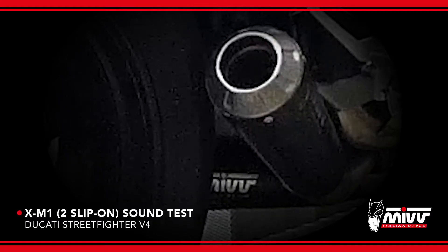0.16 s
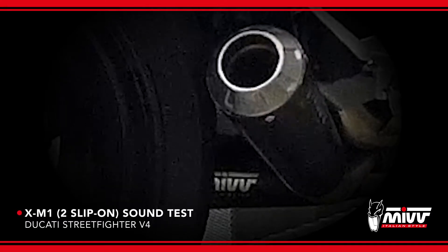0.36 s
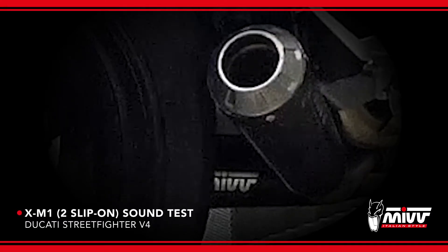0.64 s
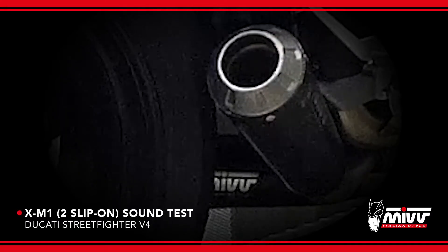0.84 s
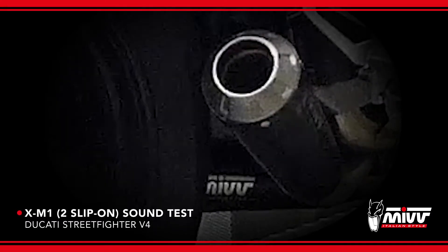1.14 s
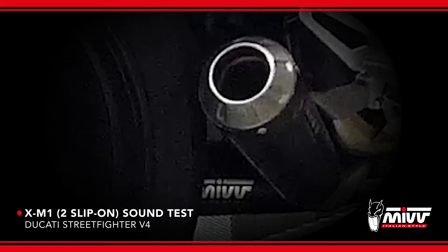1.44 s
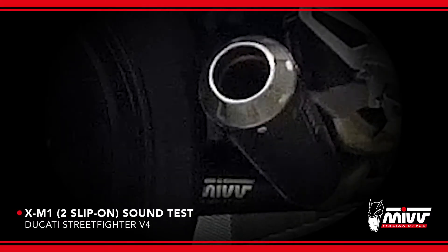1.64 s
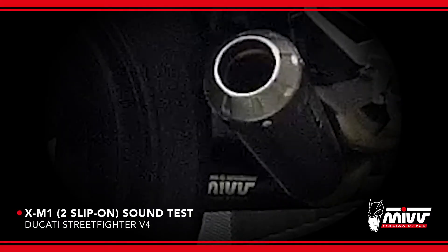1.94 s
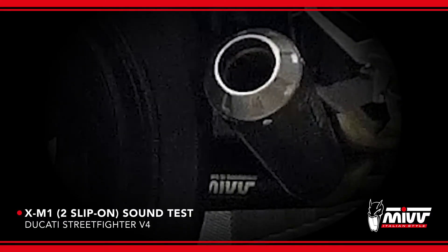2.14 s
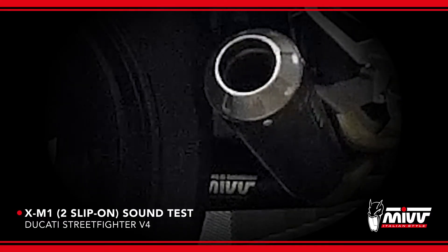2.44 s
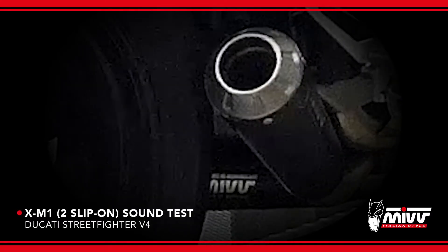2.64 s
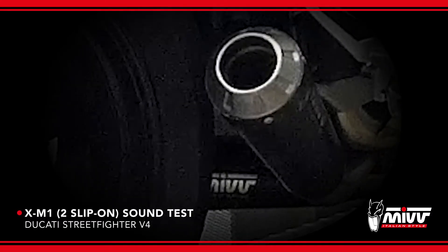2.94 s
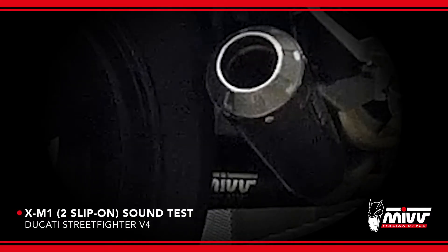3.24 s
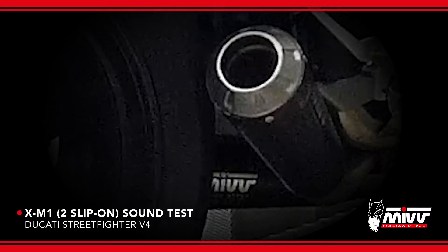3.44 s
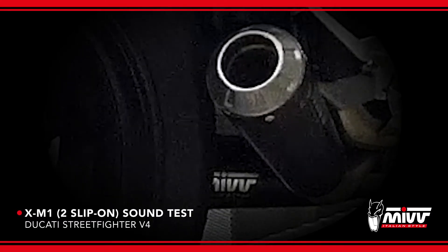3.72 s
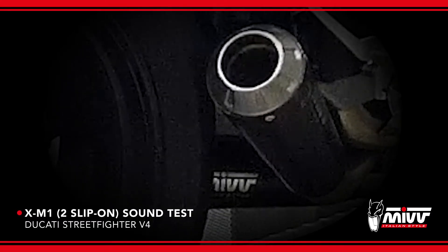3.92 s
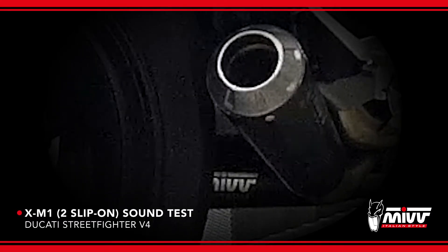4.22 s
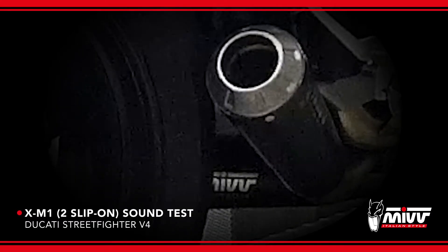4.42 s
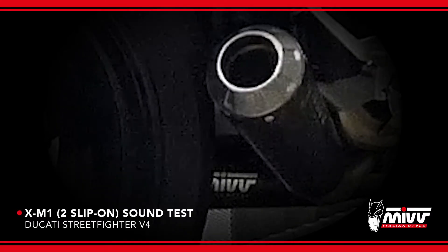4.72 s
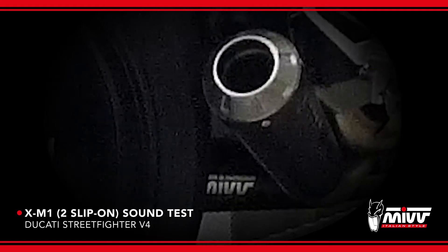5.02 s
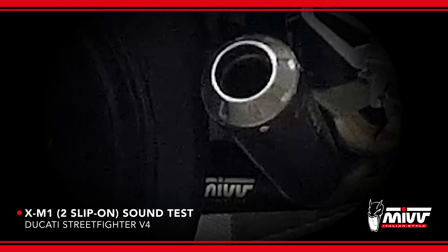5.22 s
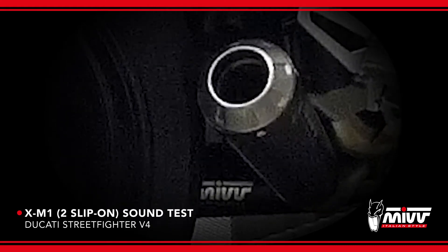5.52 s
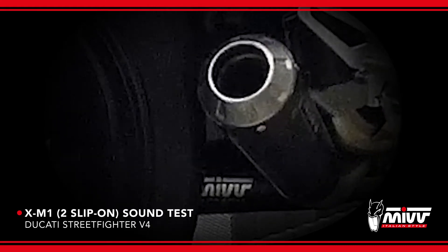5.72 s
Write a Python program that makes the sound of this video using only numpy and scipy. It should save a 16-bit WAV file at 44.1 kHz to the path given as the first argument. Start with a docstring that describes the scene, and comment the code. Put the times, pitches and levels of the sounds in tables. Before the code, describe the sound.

A four-cylinder motorcycle engine runs under load on a roller stand, heard close to the silencer, with a deep, booming, raspy exhaust note. Its pitch rises from the start until 1 second, then falls quickly as the throttle shuts. From about 1.2 to 1.7 seconds it burbles low and ragged, and the slack drive gives bright metallic cracks, the clearest at 1.3 and 1.7 seconds. From about 1.8 seconds the revs climb steadily, growing harder and raspier, to their highest point just before 5 seconds. The pitch then plunges with a ragged throb and sharp cracks near 5.05 and 5.3 seconds. Around 5.4 seconds the engine picks up again and holds middling revs, slightly uneven, until nearly 6 seconds. Gas hiss and fine valve rattle continue above the exhaust, a thin gear whine swells and fades during the pulls, and a faint tyre rumble lies underneath.

```python
"""A V4 motorcycle exhaust, heard at the silencer as the engine pulls under load on a roller stand:
the revs climb, drop, climb long and drop again. Four unevenly spaced firings per cycle ring the pipe
and rasp at the outlet; off the throttle they turn weak and ragged. Each engine layer swells at the revs
that meet its resonances. Gas hiss and valve rattle lie above, a gear whine sweeps through casing
resonances, the drive snaps as it goes slack, and the tyre rumbles underneath."""
import sys
import numpy as np
from scipy import signal
from scipy.fft import rfft, irfft, next_fast_len
from scipy.io import wavfile
from scipy.ndimage import uniform_filter1d, map_coordinates

SR = 44100
rng = np.random.default_rng(int(sys.argv[2]) if len(sys.argv) > 2 else 0)


def put_to_file(sound):
    """Save the sound as 16-bit audio at rate SR, in the file named by the first command-line argument."""
    columns = np.atleast_2d(sound).T  # one column per channel
    safe = np.clip(columns, -1, 1)
    whole_steps = np.round(safe * 32767)
    wavfile.write(sys.argv[1], SR, whole_steps.astype(np.int16))


N = 258426

# Engine speed, one cycle being two turns of the crank: (time [s], cycle rate [Hz])
CYCLE_RATE = [(0.0, 32.4), (0.15, 34.1), (0.31, 37.12), (0.88, 45.53), (0.99, 46.94), (1.08, 44.26),
              (1.17, 39.5), (1.27, 33.07), (1.32, 33.5), (1.4, 36.02), (1.55, 35.04), (1.65, 35.3),
              (1.76, 39.27), (1.78, 39.65), (1.84, 35.7), (2.04, 37.76), (2.28, 38.52), (3.02, 45.26),
              (3.82, 54.18), (4.32, 59.53), (4.8, 64.16), (4.96, 64.76), (5.03, 62.37), (5.12, 55.34),
              (5.24, 45.24), (5.26, 44.27), (5.32, 42.4), (5.34, 41.84), (5.45, 50.34), (5.47, 50.5),
              (5.75, 52.54), (5.86, 49.75)]
# Two pulls, each ended by a snap shut, then a part-open cruise: (time [s], opening [0-1])
THROTTLE = [(0, 0.96), (.3, 0.99), (1.02, 0.99), (1.08, 0.13), (1.15, 0.15), (1.25, 0), (1.58, 0.42),
            (1.77, 0.85), (1.9, 0.78), (2.4, 1), (4.96, 0.96), (4.99, 0.43), (5.18, 0.18), (5.34, 0),
            (5.47, 0.42), (5.76, 0.33), (5.86, 0.65)]
# Firing of the four cylinders: (crank angle [degrees])
FIRING_ANGLES = [0, 90, 290, 380]
# Each cylinder's header pipe: (delay [ms], strength [dB], change at full starvation [dB])
HEADERS = [(0.24, 4.6, 3), (1.61, 3.2, 4), (0.081, 3.65, 3), (1.965, 2.9, 8)]
# Spells of ragged burning:
# (start [s], end [s], strength scatter [share of mean], starvation [0-1], throb [dB], thump [dB])
RAGGED_SPELLS = [(1.147, 1.746, 0.44, 0.1, -36, -28.5), (4.976, 5.2, 0.22, .15, -34, -23),
                 (5.44, 5.9, 0.13, 0.08, -59, -26)]

# Spectral envelopes: (frequency [Hz], gain [dB])
PIPE_SPECTRUM = [(25, -30.5), (80, -36.5), (135, -28), (178, -15.5), (203, -3), (230, 2), (300, -1),
                 (350, -5.5), (450, -10), (600, -16), (1000, -32), (1300, -41), (1800, -47), (2400, -32),
                 (4000, -62)]
JET_SPECTRUM = [(200, -49), (600, -18), (1000, 4), (1300, 7), (1600, -7), (1900, -11), (3000, 2),
                (6000, -46)]
RUSH_SPECTRUM = [(1060, -59), (1800, -18), (1970, -18.5), (2160, -13), (2500, -11.5), (2780, -3),
                 (3340, -0.5), (3660, -0.5), (4470, -5.5), (5870, -5), (6910, -8), (11600, -7.5),
                 (12900, -8.5), (14200, -8), (15800, -15.5)]
TYRE_SPECTRUM = [(20, -21), (40, -3.5), (65, -1), (90, -12), (160, -5), (250, -0.5), (520, -3), (750, -13),
                 (1200, -29.5), (1900, -26), (3000, -64)]
# Resonances and, where negative, notches: (frequency [Hz], width [Hz], gain [dB])
PIPE_MODES = [(59.5, 13, 26), (107.9, 34.5, 23.5), (148.6, 6.4, 10), (374.4, 7.5, -17), (410.4, 22.3, 11),
              (421.5, 19.3, -13.5), (478, 7.2, -14), (533.7, 86, 6.5), (586.5, 39, -13), (606, 34, 7),
              (676, 19, -20), (734, 13.6, -45), (751, 54, 7.5), (838, 29, 5.5), (913, 14.4, -17),
              (964.5, 53, 11), (1134, 41, -4), (1226, 48, 8.5), (2174, 89, 9)]
JET_MODES = [(1102, 73, -13), (1200, 40, 10.5), (1437, 39, 10.5), (1534.4, 39, 13), (1610, 58, 15.5)]
CASING_MODES = [(2844, 20, 1), (3303, 41, 7.5), (3570, 240, 2.5), (4294, 69, 9.5), (4390, 370, -6.5),
                (5730, 28, 7.5), (5824, 56, 7.5), (6000, 28, 7.5), (6660, 46, -2), (9100, 200, 3),
                (11470, 1100, 3.5)]
WHINE_MODES = [(4680, 250, 6), (5770, 250, 18), (6170, 200, 11), (7550, 900, 2), (9150, 330, 14)]  # casing resonances that the gear tone sweeps through
# Speeds at which an engine order meets a layer's resonance: (cycle rate [Hz], width [Hz], gain [dB])
THROB_SWELLS = [(31.9, 4, 11), (57.7, 5.06, 15.5), (62.36, 5.8, 17.5)]
THUMP_SWELLS = [(34, 3.7, 7.2), (54.32, 7.4, 17), (60.5, 8.04, 12)]
BOOM_SWELLS = [(36.7, 2, -1.2), (45.97, 17.5, 10), (58.9, 9.1, 3.5)]
BARK_SWELLS = [(33.9, 3.6, 5.6), (40.5, 2.5, 7.5), (45.34, 2.2, 5.9), (50.9, 4.8, 5.8), (57, 6.2, 4.6),
               (64.5, 3.7, 6.2)]
RASP_SWELLS = [(36.5, 1.4, 6.8), (41.2, 2, 9.15), (45.15, 1.2, 10.5), (49.3, 2.6, 6.3), (62.4, 14.4, 9.3)]
TREBLE_SWELLS = [(33, 3, -1), (39.06, 7.8, 4), (46.7, 4.5, 1.54), (59.3, 8.5, 3)]
# Impacts in the slack drive: (time [s], relative level [dB])
DRIVE_SNAPS = [(1.1674, -20.5), (1.1942, -27), (1.2512, -31), (1.3013, -9.5), (1.7007, -11), (5.0544, -14),
               (5.2883, -8.5)]

MID_SPEED_HZ, BAND_LIMIT_HZ = 50, 15800
CLEAN_SCATTER, SPELL_FADE_S = .015, 0.077  # strength scatter of clean burning; fade of a ragged spell
TEETH_PER_CYCLE = 121
WHINE_DB, WHINE_OCTAVE_DB = -44, -45  # at full throttle, away from resonances


def exhaust(train, soft_hz):
    """Pipe resonance: pressure pulses excite a deep throb and thump, the silencer's boom and a bark."""
    ragged_throb, ragged_thump = ragged_burning()[2:]
    throb = layer_gain(-46, THROB_SWELLS, shut_db=7, shut_db_per_octave=-4, shut_swell=.3)
    thump = layer_gain(-45, THUMP_SWELLS, shut_db=0, shut_db_per_octave=-8, shut_swell=0.58)
    boom = layer_gain(-16.5, BOOM_SWELLS, shut_db=-4.5, shut_db_per_octave=8)
    bark = layer_gain(-27, BARK_SWELLS, shut_db=-8.5, shut_db_per_octave=-4, shut_swell=.12)
    # a closed throttle rounds the pulses off
    hard = 0.057 + hardness(power=3.8)
    pressure = hard * train + (1 - hard) * lowpass(train, soft_hz, order=2)
    pressure = pressure - lowpass(pressure, edge_hz=18, order=2)
    pipe = resonate(pressure, PIPE_SPECTRUM, PIPE_MODES)
    lowest, deep, body = [lowpass(pipe, edge_hz) for edge_hz in (95.5, 154, 347.4)]
    bass = np.hypot(throb, ragged_throb) * steady(lowest, size=5001)
    bass += np.hypot(thump, ragged_thump) * steady(deep - lowest, size=5001)
    return bass + boom * steady(body - deep) + bark * steady(pipe - body)


def firings(cycles, jitter_s_per_scatter):
    """Propagation delay: each exhaust stroke sends one pulse, which arrives later from a longer header."""
    delay_ms, strength_db, starved_db = np.transpose(HEADERS)
    samples = np.arange(N)
    firing_cycles = np.arange(int(cycles[-1]) + 1)[:, None] + np.array(FIRING_ANGLES) / 720
    arrivals = np.interp(firing_cycles, cycles, samples, right=2 * N) + delay_ms * SR / 1000
    scatter, starvation = [np.interp(arrivals, samples, curve) for curve in ragged_burning()[:2]]
    scatter += CLEAN_SCATTER
    chance = rng.standard_normal((*arrivals.shape, 2))
    sizes = amp(strength_db + starvation * starved_db) * np.abs(1 + scatter * chance[..., 0])
    # a poor burn is also early or late
    arrivals += SR * jitter_s_per_scatter * scatter * chance[..., 1]
    return impulses(arrivals.ravel(), sizes.ravel())


def ragged_burning():
    """Combustion variability: the scatter, starvation, throb gain and thump gain that the spells add."""
    t = np.arange(N) / SR
    total = np.zeros((4, N))
    for start, end, scatter, starved, throb_db, thump_db in RAGGED_SPELLS:
        gate = np.clip(np.minimum(t - start, end - t) / SPELL_FADE_S + .5, 0, 1)
        total += np.outer([scatter, starved, amp(throb_db), amp(thump_db)], gate)
    return total


def hardness(power):
    """Pulse steepness, 0-1: it grows with the throttle and as a power of engine speed."""
    speed = timeline(CYCLE_RATE)
    return timeline(THROTTLE) * (speed / speed.max()) ** power


def layer_gain(base_db, swells, shut_db, shut_db_per_octave, shut_swell=1):
    """Forced resonance: gain swells at set speeds. A shut throttle shifts it and scales the swells."""
    speed, shut = timeline(CYCLE_RATE), 1 - timeline(THROTTLE)
    swell_db = resonance_db(swells, speed) * (1 - shut * (1 - shut_swell))
    shift_db = shut_db + shut_db_per_octave * np.log2(speed / MID_SPEED_HZ)
    return amp(base_db + swell_db + shut * shift_db)


def gas_flow(train, decay_s):
    """Exponential relaxation: the puff of gas that follows each pulse, scaled to mean 1."""
    flow = np.abs(decay(train, decay_s))
    return flow / flow.mean()


def outlet_rasp(train, edge):
    """Jet turbulence: each puff leaves with a steep front, steeper at high revs, and tears into eddies."""
    eddies = unit(gas_flow(train, decay_s=0.0048) * rng.standard_normal(N))
    fronts = edge * hardness(power=4.2) * unit(train)
    jet = resonate(eddies + fronts - lowpass(fronts, edge_hz=1020), JET_SPECTRUM, JET_MODES)
    return layer_gain(-43.5, RASP_SWELLS, shut_db=-6, shut_db_per_octave=5, shut_swell=.3) * steady(jet)


def gas_hiss(train, pulsing, flutter_db):
    """Flow noise: escaping gas hisses, modulated in amplitude by every firing."""
    beat = 1 + pulsing * (gas_flow(train, decay_s=0.00217) - 1)
    noise = casing_noise(beat * amp(flutter_db * wobble(70)), grit_db=1.0)
    gain = layer_gain(-24.5, TREBLE_SWELLS, shut_db=-2.5, shut_db_per_octave=2, shut_swell=0.74)
    return gain * steady(noise - lowpass(noise, edge_hz=7500))


def valve_rattle(cycles, swing_db, chatter_db):
    """Amplitude modulation: valve gear and chain rattle unevenly, harder each cycle and crank turn."""
    swing = np.cos(2 * np.pi * cycles) + np.cos(4 * np.pi * cycles)
    noise = casing_noise(amp(swing_db * swing + chatter_db * wobble(160)), grit_db=0.77)
    gain = layer_gain(-24, TREBLE_SWELLS, shut_db=-2, shut_db_per_octave=2, shut_swell=0.26)
    return gain * steady(lowpass(noise, edge_hz=8100))


def casing_noise(envelope, grit_db):
    """Structural resonance: the metal casings colour a gritty noise that follows the envelope."""
    noise = envelope * amp(grit_db * wobble(900)) * rng.standard_normal(N)
    return resonate(noise, RUSH_SPECTRUM, CASING_MODES)


def gear_whine(cycles, waver_rad, slack_db):
    """Gear meshing: loaded teeth sing at a multiple of engine speed, louder at casing resonances."""
    phase = 2 * np.pi * TEETH_PER_CYCLE * cycles + waver_rad * wobble(150)
    mesh_hz = TEETH_PER_CYCLE * timeline(CYCLE_RATE)
    tone = amp(WHINE_DB + resonance_db(WHINE_MODES, mesh_hz)) * unit(np.sin(phase))
    octave = amp(WHINE_OCTAVE_DB + resonance_db(WHINE_MODES, 2 * mesh_hz)) * unit(np.sin(2 * phase))
    load_db = slack_db * (1 - timeline(THROTTLE)) ** 2
    return (tone + octave) * amp(load_db + 3.4 * wobble(60))


def drive_snaps(gain_db, decay_s):
    """Impact transients: the slack drive gives bright metal cracks that die away exponentially."""
    times, levels_db = np.transpose(DRIVE_SNAPS)
    envelope = decay(impulses(times * SR, amp(levels_db + gain_db)), decay_s)
    crack = lowpass(envelope * rng.standard_normal(N), edge_hz=12500, order=4)
    return crack - lowpass(crack, edge_hz=5500, order=1)


def tyre_rumble(level_db):
    """Rolling noise: the tyre rumbles steadily on the rollers."""
    return amp(level_db) * unit(resonate(rng.standard_normal(N), TYRE_SPECTRUM))


def resonate(x, spectrum, modes=()):
    """Minimum-phase filtering: x takes on a spectral envelope and its resonances, causally."""
    size = 2 * next_fast_len(N // 2 + SR // 2)
    hz = np.fft.rfftfreq(size, 1 / SR)
    knots_hz, knots_db = np.transpose(spectrum)
    gain_db = np.interp(np.log(hz + 1), np.log(knots_hz + 1), knots_db) + resonance_db(modes, hz)
    cepstrum = irfft(np.log(amp(gain_db)), size)
    # folding the cepstrum onto positive time makes the filter causal
    cepstrum[1:size // 2] *= 2
    cepstrum[size // 2 + 1:] = 0
    return irfft(rfft(x, size) * np.exp(rfft(cepstrum)), size)[:N]


def resonance_db(modes, hz):
    """Resonance curves: bell-shaped peaks and notches, summed in dB at each frequency."""
    return sum(db / (1 + (2 * (hz - centre) / width) ** 2) for centre, width, db in modes)


def lowpass(x, edge_hz, order=8):
    """Zero-phase filtering: the part of x below edge_hz."""
    size = next_fast_len(N + SR // 2)
    hz = np.fft.rfftfreq(size, 1 / SR)
    return irfft(rfft(x, size) / (1 + (hz / edge_hz) ** (2 * order)), size)[..., :N]


def impulses(positions, sizes):
    """Band-limited interpolation: a windowed sinc places each impulse between samples."""
    taps = np.floor(positions)[:, None] + np.arange(-7, 9)
    offset = taps - positions[:, None]
    shape = np.sinc(offset) * np.cos(np.pi * offset / 16) ** 2
    inside = (taps >= 0) & (taps < N)
    return np.bincount(taps[inside].astype(int), (sizes[:, None] * shape)[inside], N)


def decay(x, decay_s):
    """Leaky integration: each impulse gains an exponential tail."""
    return signal.lfilter([1], [1, -np.exp(-1 / (decay_s * SR))], x)


def wobble(rate_hz):
    """Random modulation: a smooth curve through rate_hz random knots a second."""
    knots = rng.standard_normal(int(N * rate_hz / SR) + 4)
    return map_coordinates(knots, [np.arange(N) * rate_hz / SR])


def timeline(rows):
    """Linear interpolation: (time, value) rows read at every sample."""
    return np.interp(np.arange(N) / SR, *np.transpose(rows))


def steady(x, size=3001):
    """Envelope normalisation: x with its running rms held at 1."""
    power = uniform_filter1d(uniform_filter1d(x ** 2, size), size)
    return x / np.sqrt(np.abs(power) + 1e-20)


def unit(x):
    """Normalisation: x at rms 1."""
    return x / np.sqrt(np.mean(x ** 2) + 1e-20)


def amp(db):
    """Amplitude ratio of a level in decibels."""
    return 10 ** (np.asarray(db) / 20)


def scene():
    """Superposition: layers led by crank and throttle add to the tyre rumble, alike in both channels."""
    cycles = np.cumsum(timeline(CYCLE_RATE)) / SR
    train = firings(cycles, jitter_s_per_scatter=0.0011)
    gas = exhaust(train, soft_hz=157) + outlet_rasp(train, edge=1.5)
    treble = gas_hiss(train, pulsing=0.082, flutter_db=.5)
    treble += valve_rattle(cycles, swing_db=0.81, chatter_db=0.6)
    drive = gear_whine(cycles, waver_rad=0.92, slack_db=-24) + drive_snaps(gain_db=2.5, decay_s=0.0052)
    treble *= amp(.4 * wobble(9))  # the treble wavers slightly
    bike = gas + treble + drive + tyre_rumble(level_db=-32.5)
    return np.array([bike, bike])


def record(dry):
    """Soft saturation: the loudest peaks round off at full scale, then the band is limited."""
    clipped = dry / (1 + np.abs(dry) ** 12) ** (1 / 12)
    return lowpass(clipped, BAND_LIMIT_HZ, order=200)


dry = scene()
out = record(dry)
put_to_file(out)
```